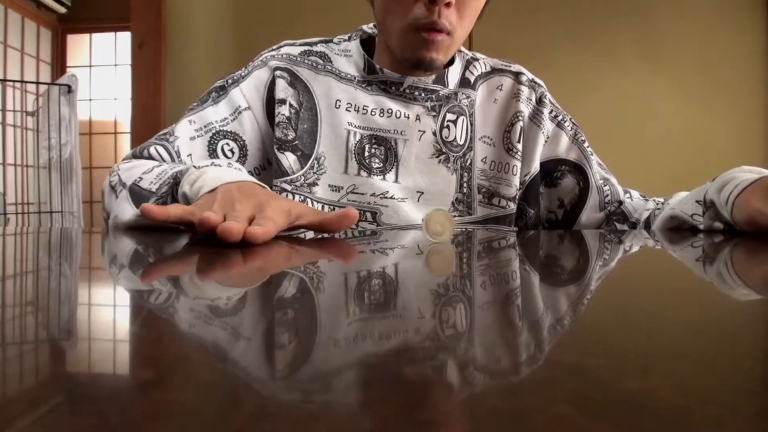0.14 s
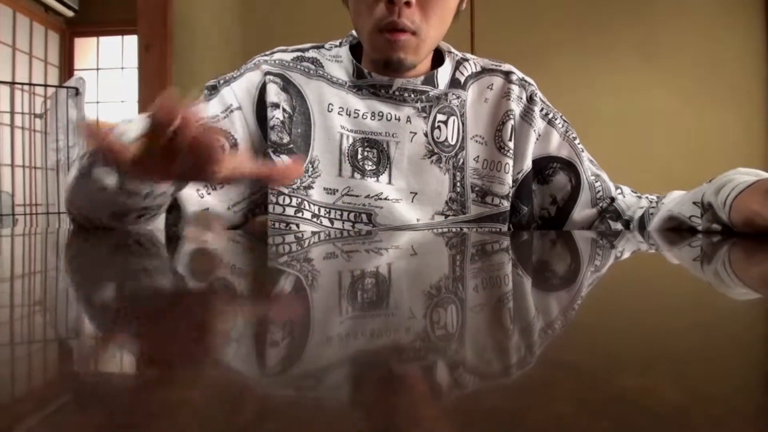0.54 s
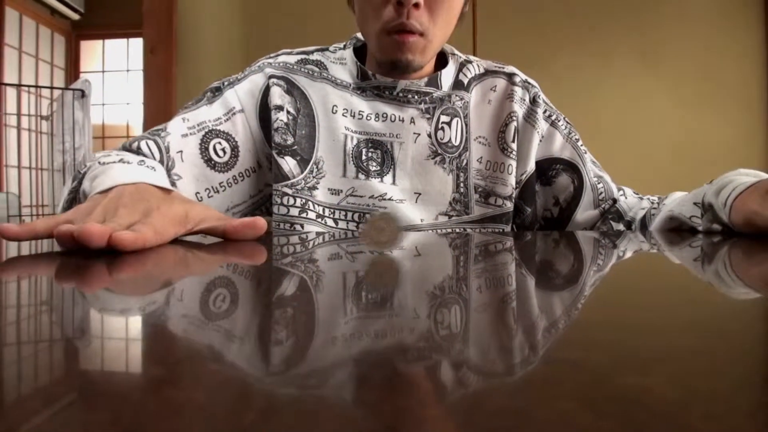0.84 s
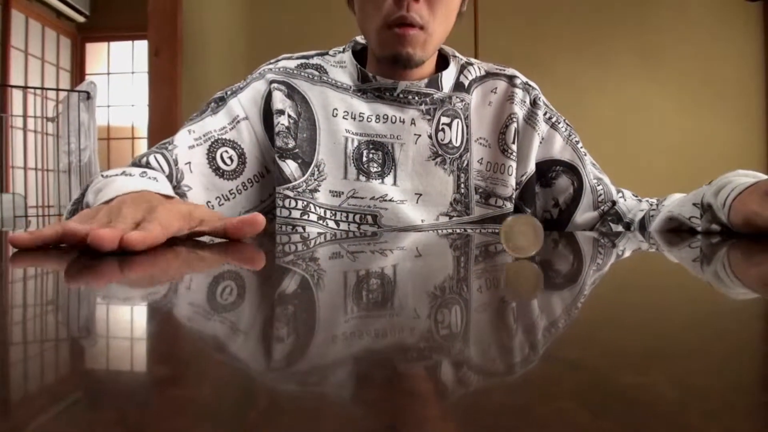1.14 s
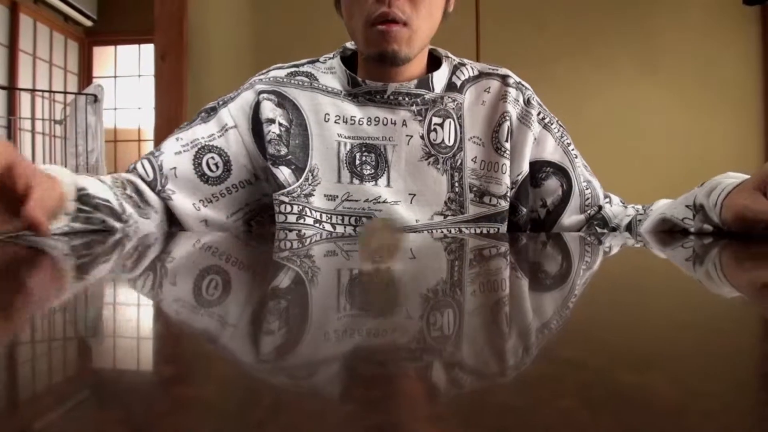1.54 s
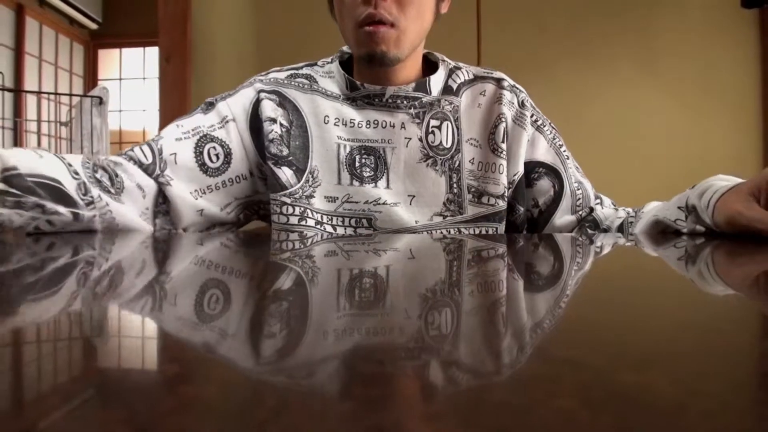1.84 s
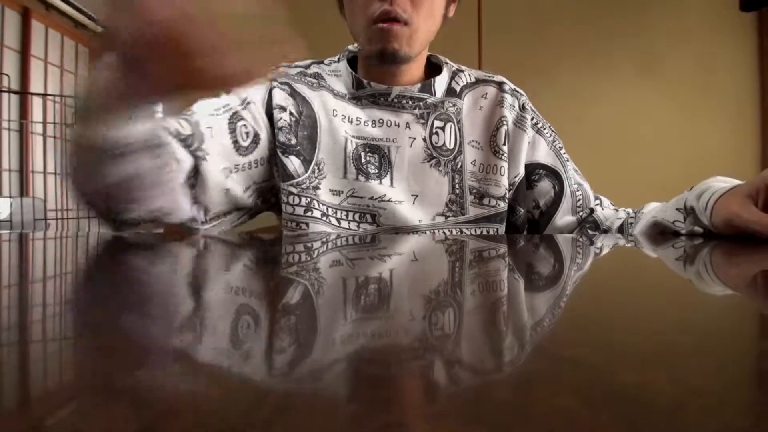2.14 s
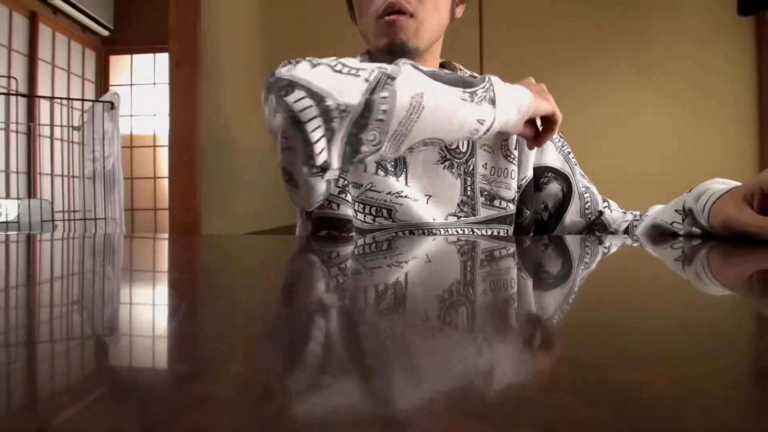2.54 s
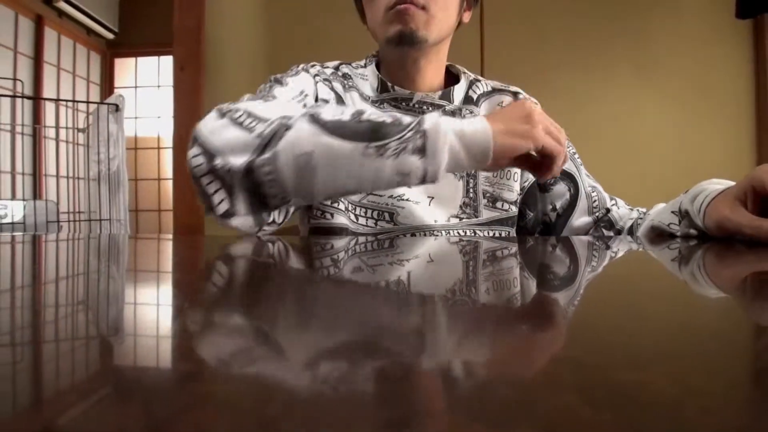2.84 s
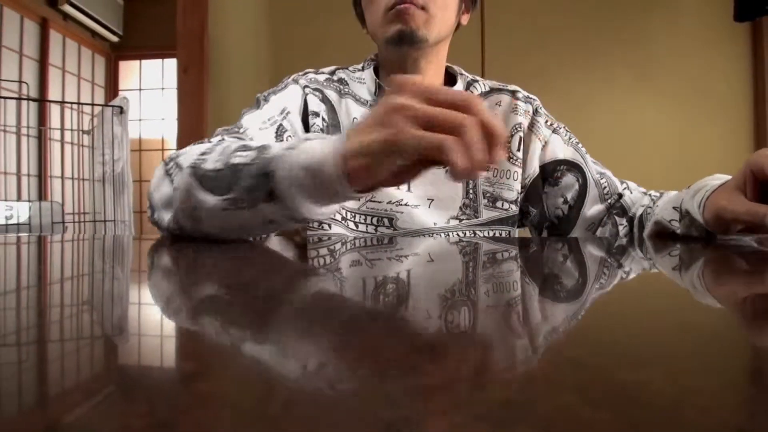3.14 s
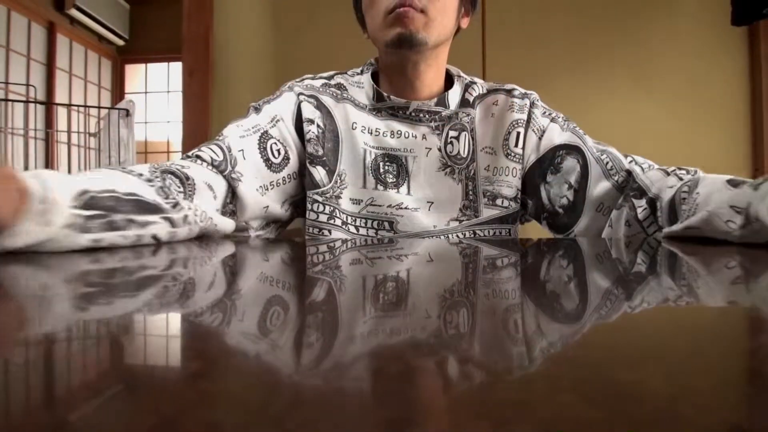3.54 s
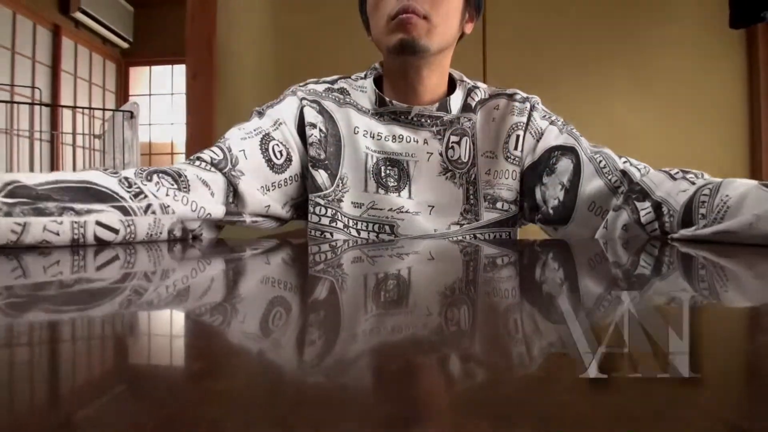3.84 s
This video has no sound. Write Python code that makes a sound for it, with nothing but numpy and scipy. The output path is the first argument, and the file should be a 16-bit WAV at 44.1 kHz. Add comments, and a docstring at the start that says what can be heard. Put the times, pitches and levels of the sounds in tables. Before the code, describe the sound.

Coin spinning and chattering over a hard tabletop, with one hand slap, then near silence.

```python
"""Rapid hard clicks: a coin spins on its rim across a table, hopping, chattering and scraping, until it
leaves the far edge at about 2 s. Near 0.6 s the rim squeaks and a hand slaps the table; later come one
tick and the swell of a sliding sleeve, in a quiet small room. Taps are impulses that pass through a click
spectrum, shifting echoes and decaying resonances; scraping, drumming, sleeve and air are shaped noise."""
import sys
import numpy as np
from scipy import signal
from scipy.fft import rfft, irfft
from scipy.io import wavfile
from scipy.ndimage import uniform_filter1d, minimum_filter1d, map_coordinates

SR = 44100
rng = np.random.default_rng(int(sys.argv[2]) if len(sys.argv) > 2 else 0)


def persist_wave(psi):
    """Save psi, clipped to +-1, as 16-bit WAV."""
    counts = np.round(np.clip(psi, -1, 1) * 32767).astype(np.int16)
    wavfile.write(sys.argv[1], SR, np.atleast_2d(counts).T)


N = 176400

# distinct hops of the coin: time_s, relative_db
HOP_TABLE = [(0.0063, -2.5), (0.0152, -2.0), (0.0305, -3.0), (0.0402, -1.5), (0.0479, -4.5), (0.0545, -3.0),
             (0.0606, -5.0), (0.0675, -2.5), (0.0744, -3.0), (0.08, -2.5), (0.0889, -2.5), (0.0955, -4.5),
             (0.1061, -3.0), (0.1164, -2.5), (0.1265, -2.0), (0.147, -1.5), (0.1563, -3.0), (0.1643, -4.5),
             (0.1709, -2.5), (0.1776, -3.5), (0.1871, -2.0), (0.2047, -2.0), (0.2185, -2.0), (0.2302, -1.5),
             (0.2365, -2.5), (0.2487, -1.5), (0.256, -5.0), (0.2631, -4.0), (0.268, -2.0), (0.2791, -1.5),
             (0.2896, -1.5), (0.299, -1.5), (0.3105, -1.0), (0.3205, -1.5), (0.3325, -3.5), (0.3383, -2.0),
             (0.344, -2.5), (0.3489, -3.0), (0.3556, -4.5), (0.3663, -3.5), (0.371, -2.0), (0.3769, -2.5),
             (0.3836, -3.0), (0.3969, -2.0), (0.4061, -2.5), (0.4145, -1.5), (0.4219, -1.0), (0.43, -2.5),
             (0.4361, -2.5), (0.4432, -2.0), (0.4505, -1.5), (0.4584, -3.5), (0.4655, -5.0), (0.4716, -4.0),
             (0.4769, -5.0), (0.492, -1.5), (0.5004, -1.5), (0.5087, -5.0), (0.5176, -4.5), (0.5251, -3.0),
             (0.5324, -3.0), (0.5398, -3.0), (0.5477, -5.0), (0.5633, -3.0), (0.5725, -3.0), (0.5818, -0.5),
             (0.5871, -3.0), (0.5968, -2.0), (0.6166, -2.0), (0.6535, -3.5), (0.6599, -2.5), (0.6682, -2.5),
             (0.6842, -2.0), (0.6988, -2.0), (0.7113, -1.5), (0.7237, -3.0), (0.7343, -3.5), (0.7407, -2.0),
             (0.7577, -2.0), (0.7777, -2.0), (0.7954, -1.0), (0.8077, -1.0), (0.8213, -2.0), (0.8356, -1.5),
             (0.8482, -0.5), (0.869, -1.5), (0.886, -0.5), (0.9102, 0.0), (0.9318, -1.5), (0.9475, -1.5),
             (0.9704, -2.0), (0.9915, -2.5), (1.0095, -2.5), (1.0298, -3.0), (1.0761, -2.5), (1.0951, -3.0),
             (1.1067, -4.5), (1.1198, -3.5), (1.1327, -4.5), (1.147, -4.0), (1.1659, -3.5), (1.187, -3.0),
             (1.2069, -3.0), (1.2247, -3.0), (1.2428, -2.5), (1.2619, -2.5), (1.2802, -3.5), (1.2948, -3.0),
             (1.3098, -4.0), (1.3317, -4.0), (1.3459, -4.0), (1.3554, -3.5), (1.3686, -3.5), (1.3895, -4.5),
             (1.465, -4.0), (1.4793, -4.5), (1.4937, -1.5), (1.5072, -2.0), (1.5188, -2.5), (1.5278, -1.5),
             (1.5381, -2.5), (1.555, -3.0), (1.5661, -1.5), (1.5793, -2.5), (1.5918, -3.0), (1.6041, -3.5),
             (1.618, -3.0), (1.6313, -4.0), (1.6396, -5.0), (1.6842, -5.0), (1.6908, -5.0), (1.6979, -4.5),
             (1.7058, -4.0), (1.7135, -4.0), (1.7204, -3.5), (1.7317, -3.0), (1.7398, -3.5), (1.7496, -3.0),
             (1.7567, -4.5), (1.763, -2.0), (1.7702, -2.5), (1.7821, -3.5), (1.7903, -2.0), (1.797, -2.0),
             (1.8062, -2.5), (1.8136, -3.5), (1.8196, -3.5), (1.8268, -5.0), (1.8803, -4.0), (1.8997, -4.0),
             (1.9065, -4.0), (1.914, -2.5), (1.9233, -3.5), (1.9314, -4.5), (1.938, -3.0), (1.9563, -3.0),
             (1.9958, -3.5), (2.0036, -3.5), (2.0145, -3.0)]
# reverberation of the table top: frequency_hz, t60_s
TOP_DECAY = [(200, 0.061), (1500, 0.05), (3000, 0.022), (8000, 0.017)]
TOP_BUILD_S = 0.0037  # build-up time of that reverberation


def amp(db):
    """Amplitude ratio: a level of 20 dB is a factor of ten."""
    return 10 ** (np.asarray(db) / 20)


def unit(x):
    """Normalisation by the root mean square, so that the rms becomes 1."""
    return x / np.sqrt(np.mean(x ** 2) + 1e-20)


def along(points, hz):
    """Interpolation of (frequency_hz, value) points on a logarithmic frequency axis."""
    f, v = np.transpose(points)
    return np.interp(np.log(hz + 1), np.log(f + 1), v)


def curve(points):
    """Linear interpolation of (time_s, value) points at every sample; the end values are held."""
    return np.interp(np.arange(N) / SR, *np.transpose(points))


def sides(db):
    """Interaural level difference: left and right gains of mean 1, left louder when db is positive."""
    g = amp(np.array([[.5], [-.5]]) * db)
    return g / g.mean(0)


def convolve(x, response):
    """Linear superposition: every sample of x launches a scaled copy of the impulse response."""
    return signal.fftconvolve(np.atleast_2d(x), np.atleast_2d(response), axes=1)[:, :N]


def click(colour, size=4096):
    """Minimum-phase pulse of peak 1, whose energy comes as early as its spectrum allows."""
    log_spectrum = np.log(amp(along(colour, np.fft.rfftfreq(size, 1 / SR))))
    # folding the cepstrum onto positive times makes the pulse causal
    cepstrum = irfft(log_spectrum)
    cepstrum[1:size // 2] *= 2
    cepstrum[size // 2 + 1:] = 0
    pulse = irfft(np.exp(rfft(cepstrum)))
    return pulse / np.abs(pulse).max()


def impulses(times, gains):
    """Band-limited impulses: windowed sinc functions place each one between samples."""
    index = np.floor(times * SR)[:, None] + np.arange(-7, 9)
    off = index - times[:, None] * SR
    shape = np.sinc(off) * np.cos(np.pi * off / 16) ** 2
    places = np.clip(index, 0, N - 1).astype(int)
    return np.bincount(places.ravel(), (gains[:, None] * shape).ravel(), N)


def noise(colour, side_db):
    """Filtered Gaussian noise of rms 1; the level of the side signal sets the stereo width."""
    gain = amp(along(colour, np.fft.rfftfreq(N, 1 / SR)))
    mid, side = irfft(rfft(rng.standard_normal((2, N))) * gain, N)
    side = amp(side_db) * side
    return unit(np.array([mid + side, mid - side]))


def resonance(hz, lift_db, t60, size):
    """Damped oscillator struck by a unit blow; lift_db is its gain at the centre frequency."""
    t = np.arange(size) / SR
    decay = np.log(1000) / t60
    return amp(lift_db) * 2 * decay / SR * np.exp(-decay * t) * np.cos(2 * np.pi * hz * t)


def diffuse(x, t60, build_s, side_db, count):
    """Diffuse reverberation: decaying noise responses, count in all, crossfade one into the next."""
    wide_hz = 368  # well below this, both ears receive nearly the same ringing
    out = np.zeros((2, N))
    place = np.arange(N) / N * (count - 1)
    for k in range(count):
        hz, t, z = signal.stft(rng.standard_normal((2, SR // 3)), SR, nperseg=128)
        z[1] *= (hz / (hz + wide_hz))[:, None]
        decay = amp(-60 * t / along(t60, hz)[:, None])
        mid, side = signal.istft(z * decay, SR, nperseg=128)[1]
        side = amp(side_db) * side
        age = np.arange(len(mid)) / SR
        tail = np.array([mid + side, mid - side]) * (1 - np.exp(-(age / build_s) ** 2))
        tail = tail / np.sqrt(np.sum(tail ** 2) / 2)
        # only the stretch of x near this response feeds it
        near = np.flatnonzero(np.abs(place - k) < 1)
        fed = x[near] * np.cos(np.pi / 2 * (place[near] - k))
        part = signal.fftconvolve(fed[None], tail, axes=1)[:, :N - near[0]]
        out[:, near[0]:near[0] + part.shape[1]] += part
    return out


def scrape(grain_hz=260):
    """Friction noise: the rim scrapes in random spurts, hardest just before each distinct hop."""
    # time_s, rms_db
    scrape_level = [(0, -37), (.2, -41), (.55, -43), (.65, -33), (.8, -38), (.92, -34), (1.0, -37),
                    (1.05, -30), (1.12, -39), (1.32, -37), (1.43, -30), (1.6, -38), (1.85, -36),
                    (2.015, -36), (2.03, -90)]
    # frequency_hz, relative_db
    scrape_colour = [(40, -50), (200, -16), (800, -6), (2000, -2), (4300, 0), (6000, -8), (7500, -13),
                     (10000, -30), (15000, -44)]
    rough_db, lead_db = 4, 9  # random unevenness, and the rise before a hop
    lead_s, lead_width_s = 0.0048, 0.002
    spurts = map_coordinates(rng.standard_normal(N), [np.arange(N) * grain_hz / SR])
    starts = np.transpose(HOP_TABLE)[0] - lead_s
    bump = signal.windows.gaussian(SR // 20, lead_width_s * SR)
    lead = signal.fftconvolve(impulses(starts, np.ones(len(starts))), bump, 'same')
    rough = amp(rough_db * spurts + lead_db * lead) * noise(scrape_colour, side_db=-9.5)
    return amp(curve(scrape_level)) * unit(rough)


def drum():
    """Forced vibration: the rolling coin makes the top drum softly and low, most strongly near the edge."""
    # time_s, rms_db
    drum_level = [(0, -73), (1.2, -66), (1.6, -56.5), (1.8, -57.5), (2.0, -48.5), (2.07, -60), (2.2, -100)]
    # frequency_hz, relative_db
    drum_colour = [(60, -35), (110, 8.5), (170, 17), (260, 8), (500, -25)]
    return amp(curve(drum_level)) * noise(drum_colour, side_db=-30.0)


def still_air():
    """Stationary background noise: the air of the room, whose level falls over the scene."""
    # frequency_hz, relative_db
    air_colour = [(20, -22), (60, -30), (90, -12.5), (140, -0.5), (180, -6.5), (235, 6.5), (320, 2),
                  (400, 7.5), (600, -0.5), (1500, -1), (3800, -10), (7000, -16.5), (10000, -21),
                  (15800, -30)]
    # time_s, rms_db
    air_level = [(0, -41), (2.15, -52.5), (2.6, -56), (3.4, -57.5), (3.8, -56.5), (4, -59)]
    return amp(curve(air_level)) * noise(air_colour, side_db=-11.5)


def taps(count=16):
    """Impact train: times and gains of the distinct hops and of the uneven chatter between them."""
    # runs of fast chatter of the rim: start_s, end_s, taps_per_s, relative_db
    chatter = [(1.039, 1.068, 182, -6.5), (1.376, 1.40, 163, -6), (1.402, 1.46, 160, -6),
               (1.471, 1.488, 140, -6.5), (1.648, 1.682, 180, -7.5), (1.834, 1.9, 169, -7),
               (1.965, 1.991, 147, -3)]
    gap_scatter, tap_scatter_db = 0.18, 1  # standard deviations: of log gap, and of level
    hop_db = -3.5  # common gain of all contacts
    rows = list(HOP_TABLE)
    for start, end, rate, db in chatter:
        gap, size = rng.standard_normal((2, count))
        gaps = np.exp(gap_scatter * gap) / rate
        times = start + np.cumsum(gaps) - gaps[0]
        rows += [(s, db - tap_scatter_db * z) for s, z in zip(times, size) if s < end]
    times, db = np.transpose(rows)
    return times, amp(db + hop_db)


def gliding(times, gains, size=800):
    """Position-dependent resonance: each tap rings the frequencies that belong to where it lands."""
    # three resonances of the top that glide as the coin wanders, each a list of: time_s, frequency_hz
    glides = [
        [(0, 2210), (.14, 2240), (.24, 1900), (.38, 1920), (.48, 1520), (.85, 1370), (1.6, 660)],
        [(0, 4000), (.3, 3260), (.5, 2700), (.68, 2570), (.85, 2200), (1.05, 1880), (1.3, 1740), (1.55, 1460),
         (1.8, 1440), (2.02, 1490)],
        [(0, 5450), (.75, 3410), (1.05, 2800), (1.28, 2760), (1.52, 2285), (1.78, 1880), (1.92, 1570),
         (2.02, 1900)],
    ]
    # lift of each of the three at the best frequency: lift_db
    glide_lift = [-3, -2, -1]
    best_hz, fall_db = 2220, 11  # taps ring the glides best here; dB lost per octave away
    index = np.round(times * SR).astype(int)[:, None] + np.arange(size)
    rings = 0
    for glide, db in zip(glides, glide_lift):
        hz = np.interp(times, *np.transpose(glide))[:, None]
        lift_db = db - fall_db * np.abs(np.log2(hz / best_hz))
        rings = rings + resonance(hz, lift_db, t60=0.02, size=size)
    return np.bincount(index.ravel(), (gains[:, None] * rings).ravel(), N)[:N]


def coin():
    """Impact and propagation: taps arrive directly and by shifting echoes, and leave top and coin ringing."""
    # travel time of six echoes in the top as the coin wanders: time_s, then delay_ms for each echo
    paths = [(0.0, 0.42, 0.95, 4.75, 2.63, 3.67, 4.64), (0.2, 0.48, 1.02, 3.5, 2.63, 3.97, 4.86),
             (0.38, 0.65, 1.13, 2.73, 2.64, 3.74, 4.81), (0.55, 0.71, 1.48, 2.5, 2.62, 3.68, 4.48),
             (0.72, 0.83, 1.56, 2.02, 2.67, 3.85, 4.38), (0.88, 0.89, 1.85, 2.27, 2.59, 3.92, 4.69),
             (1.08, 1.01, 2.41, 2.42, 2.61, 3.7, 4.68), (1.3, 1.14, 2.23, 3.29, 2.48, 3.75, 4.77),
             (1.55, 1.29, 2.14, 3.63, 2.69, 3.85, 4.97), (1.78, 1.36, 1.98, 3.97, 2.5, 4.06, 4.7),
             (2.02, 1.25, 2.04, 3.79, 2.57, 3.84, 4.52)]
    # the same six echoes: strength (gain), left_over_right_db
    echoes = [(.69, 5), (.25, -8), (.19, 6), (.48, -5), (.35, 5), (.28, -5)]
    # side from which the direct click arrives: time_s, left_over_right_db
    pan = [(0, -7), (.2, -2.5), (.45, 4), (.6, 7), (.85, 0), (1.3, -3), (1.55, 1), (1.75, 8), (1.92, 19),
           (2.02, 21)]
    # spectrum of one click: frequency_hz, relative_db
    click_colour = [(30, -50), (70, -43), (120, -35.5), (250, -26.5), (500, -8.5), (1000, -8), (1500, -1),
                    (2000, 1.5), (3000, -2.5), (4500, -11.5), (6000, -25), (7500, -29.5), (10000, -51),
                    (15000, -58)]
    # change in the treble of the clicks: time_s, gain_db
    treble_level = [(0, 5.5), (.25, -4.5), (.55, -24), (.66, 6), (.9, 5), (1.2, 3), (1.45, -0.5),
                    (1.7, -11.5), (2.02, -31)]
    # lasting modes of the table: frequency_hz, lift_db, t60_s
    table_modes = [(287.3, 17, 0.078), (563, 6.5, 0.079), (1884, 1.5, 0.12)]
    # a mode of the top that sounds mid-table: time_s, lift_db
    hum_lift = [(.65, -3), (.8, 17.5), (1.35, 17), (1.5, -4)]

    times, gains = taps()
    blows = impulses(times, gains)
    direct = blows * sides(curve(pan)) + gliding(times, gains)
    top = direct + amp(-4) * diffuse(blows, TOP_DECAY, TOP_BUILD_S, side_db=0, count=25)
    when, *delays_ms = np.transpose(paths)
    for delay_ms, (strength, pan_db) in zip(delays_ms, echoes):
        arrivals = times + np.interp(times, when, delay_ms) / 1000
        top = top + strength * (sides(pan_db) * impulses(arrivals, gains) + gliding(arrivals, gains))

    modes = sum(resonance(hz, db, t60, size=SR // 2) for hz, db, t60 in table_modes)
    hum = convolve(blows * amp(curve(hum_lift)), resonance(841, 0, t60=0.17, size=SR // 2))
    clicks = convolve(top + hum + convolve(blows, modes), click(click_colour))

    high_pass = signal.butter(2, 4370, 'high', fs=SR, output='sos')
    treble = signal.sosfiltfilt(high_pass, clicks)
    # the coin's own high ring
    coin_hz, coin_db, coin_t60_s = 13320, -63, .3
    t = np.arange(SR // 2) / SR
    metal = amp(coin_db - 60 * t / coin_t60_s) * np.sin(2 * np.pi * coin_hz * t)
    return clicks + (amp(curve(treble_level)) - 1) * treble + convolve(blows, metal)


def small_room(source):
    """Room reverberation: a dense answer to the sounds of the table, decaying at its own rate per frequency."""
    # frequency_hz, t60_s
    room_decay = [(150, 0.23), (1000, 0.17), (4000, 0.2), (10000, 0.1)]
    return amp(-13) * diffuse(source.mean(0), room_decay, build_s=0.015, side_db=-8, count=30)


def squeak():
    """Frictional tone: the rim skids once, a bright sine under a short Gaussian envelope."""
    centre_s, width_s, squeak_hz, squeak_db = .597, .0045, 2750, -12
    t = np.arange(N) / SR - centre_s
    return amp(squeak_db) * np.exp(-.5 * (t / width_s) ** 2) * np.sin(2 * np.pi * squeak_hz * t)


def slap(attack_s=0.0017):
    """Soft impact: palm and fingers each give the table a push and a short, dull, decaying shudder."""
    # palm and fingers landing: time_s, relative_db, t60_s
    landings = [(0.599, -32, 0.079), (.603, -8, 0.12), (0.618, -16.5, 0.12), (0.643, -12.5, 0.086)]
    # frequency_hz, relative_db
    slap_colour = [(20, -23), (35, -29), (55, -36), (75, -30), (95, -31), (115, -5), (200, -4), (286, 5),
                   (450, -8), (580, -3), (800, -13), (1280, -1.5), (2000, -14.5), (4000, -19.5),
                   (9000, -36), (15000, -67)]
    push_db = 2  # strongest push
    t = np.arange(N) / SR
    shudder = 0
    for start, level_db, t60 in landings:
        age = np.maximum(t - start, 0)
        shudder = shudder + amp(level_db - 60 * age / t60) * (1 - np.exp(-age / attack_s))
    times, db, _ = np.transpose(landings)
    push = convolve(impulses(times, amp(db - db.max() + push_db)), click(slap_colour))
    return push + shudder * noise(slap_colour, side_db=-9.5)


def sleeve():
    """Friction noise of cloth: a sleeve moves over the table, very faint at first and swelling late."""
    # time_s, rms_db
    sleeve_level = [(2.8, -68), (3.2, -61.5), (3.48, -61.5), (3.62, -55.5), (3.78, -53.5), (3.87, -63),
                    (4, -66.5)]
    # frequency_hz, relative_db
    sleeve_colour = [(200, -21), (1000, 2), (3000, 6.5), (6500, 5), (9000, -3), (12000, -6), (15500, -20)]
    return amp(curve(sleeve_level)) * noise(sleeve_colour, side_db=-4.5)


def tick(ring_db=-3):
    """Impulse response of the top: one faint, dry blow with its short reverberation."""
    # frequency_hz, relative_db
    tick_colour = [(100, -23), (600, 6), (3000, 4), (5500, -2), (9000, -24), (15000, -31)]
    tick_s, tick_db = 2.8873, -33
    blow = impulses(np.array([tick_s]), np.array([amp(tick_db)]))
    ring = amp(ring_db) * diffuse(blow, TOP_DECAY, TOP_BUILD_S, side_db=-1, count=2)
    return convolve(blow + ring, click(tick_colour))


def scene():
    """Superposition: the table and its reverberation in a small room, with the sleeve and the still air."""
    table = coin() + scrape() + drum() + squeak() + slap() + tick()
    return table + small_room(table) + sleeve() + still_air()


def record(dry, ceiling=0.54, window=65, cut_hz=15800):
    """Peak limiting and band limiting: a fast gain holds the mean of both channels under the ceiling."""
    need = np.minimum(1, ceiling / (np.abs(dry.mean(0)) + 1e-9))
    gain = uniform_filter1d(minimum_filter1d(need, size=window), size=window)
    spectrum = rfft(dry * gain, 2 * N)
    return irfft(spectrum * (np.fft.rfftfreq(2 * N, 1 / SR) < cut_hz))[:, :N]


dry = scene()
out = record(dry)
persist_wave(out)
```